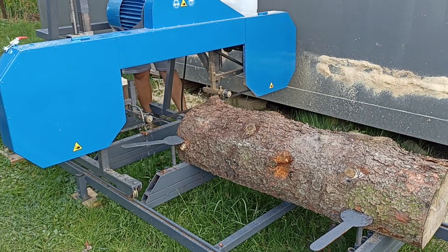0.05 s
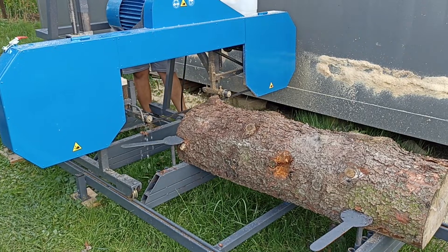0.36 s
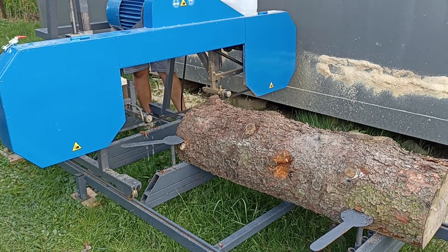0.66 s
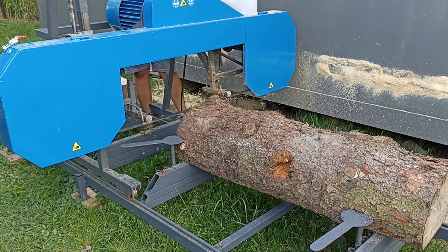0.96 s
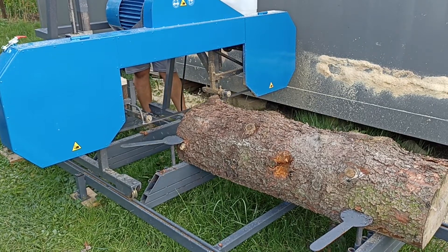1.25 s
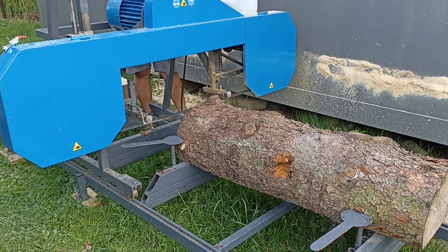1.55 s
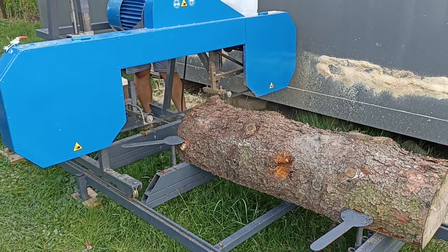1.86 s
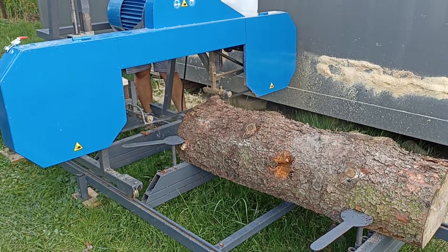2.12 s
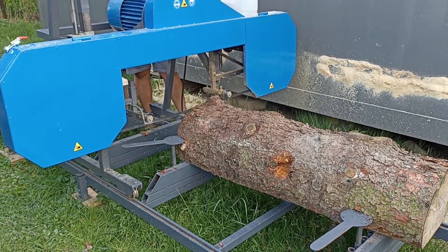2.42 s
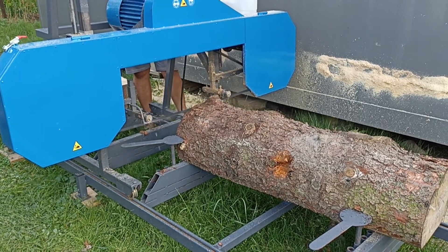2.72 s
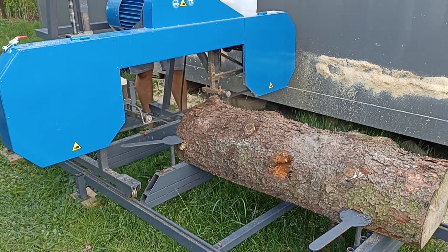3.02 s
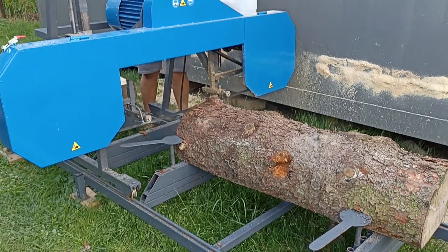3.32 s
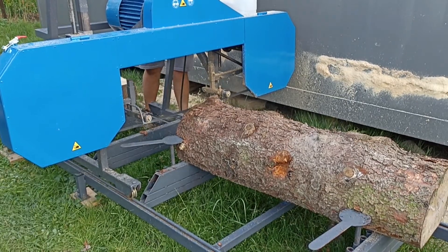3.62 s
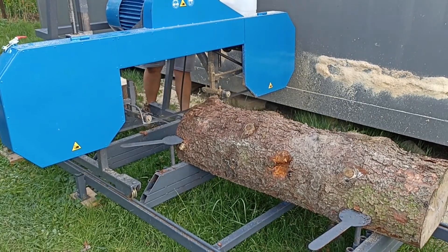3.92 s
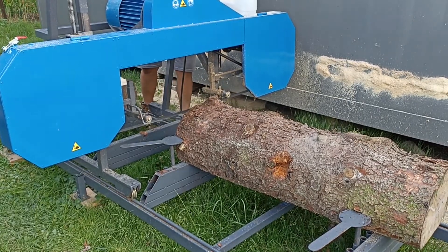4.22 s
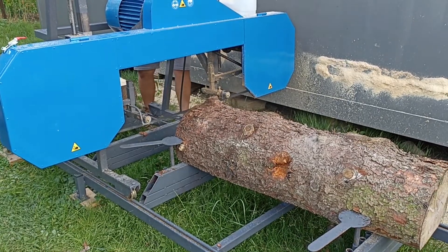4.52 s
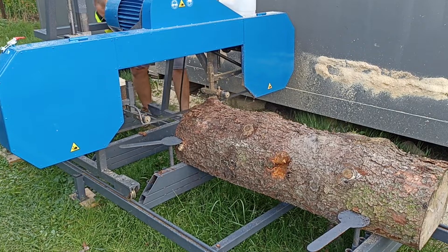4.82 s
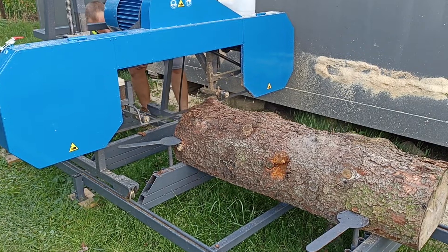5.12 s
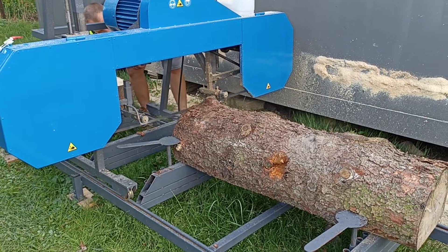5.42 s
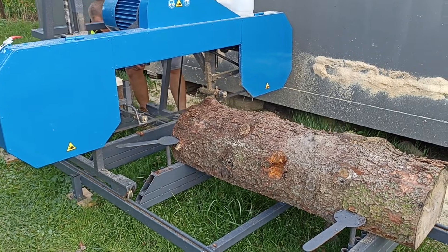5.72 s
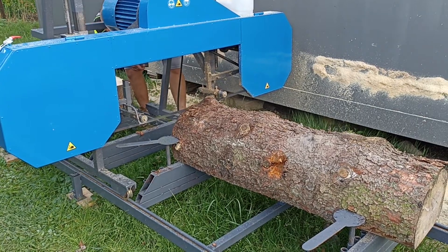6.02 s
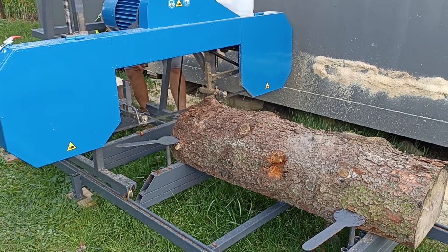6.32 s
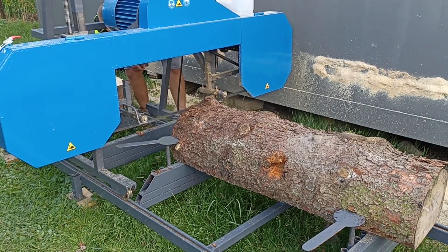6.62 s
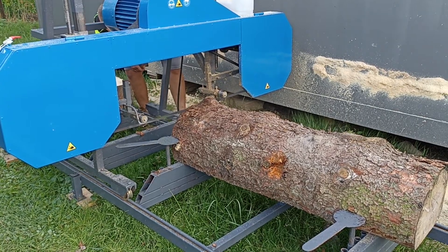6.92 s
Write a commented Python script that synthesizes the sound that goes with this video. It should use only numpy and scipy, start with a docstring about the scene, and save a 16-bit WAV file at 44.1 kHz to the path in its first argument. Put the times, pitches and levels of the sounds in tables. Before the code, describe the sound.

For the first half second there is only quiet open air with a few faint clicks and dull bumps from a machine's controls. At about 0.6 seconds a switch snaps and the motor of an electric band sawmill starts with a jolt. A brief metallic groan and a thin squeak follow around 0.8 seconds. The wheels run up with a rising whine, a hollow boom from the steel covers and a short rattling shudder, reaching full speed just before 2 seconds. From there the saw runs steadily: a drone of many tones, a low rumble, a fast even rattle and a bright blade hiss, stronger on the right. From roughly 3.5 to 6.5 seconds the blade slaps lightly and rapidly against its guides. The sound eases very slightly after 4 seconds and is still running at the end, around 7 seconds.

```python
"""A few small clicks and bumps sound in quiet open air; then the switch of a band sawmill snaps in.
The motor jolts, the frame groans briefly, a squeak follows, and the band wheels run up in just over a
second while the passing teeth sweep through the steel's resonances. At full speed wheels and belt drone
at multiples (orders) of the rotation rate and rattle on every turn, the wheel covers boom, and the
blade slaps its guides and hisses through them by friction."""
import sys
import numpy as np
from scipy.fft import rfft, irfft, next_fast_len
from scipy.io import wavfile
from scipy.ndimage import uniform_filter1d, map_coordinates

SR = 44100
rng = np.random.default_rng(int(sys.argv[2]) if len(sys.argv) > 2 else 0)


def int16_out(signal):
    """Quantize to a 16-bit WAV file."""
    q = np.round(np.clip(np.atleast_2d(signal).T, -1, 1) * 32767)
    wavfile.write(sys.argv[1], SR, q.astype(np.int16))


N = 315756

# likeness of the two channels: (frequency [Hz], correlation [0..1])
COHERENCE = [(30, 0.068), (100, 1), (400, 0.84), (800, 0.84), (1400, 0.55), (3000, 0.064), (15000, 0.057)]
# stereo balance: (frequency [Hz], left minus right [dB])
BALANCE_CURVE = [(100, 0), (400, -1), (800, -0.5), (1500, -4.5), (3300, -6), (4600, -10), (6000, -9.5),
                 (6800, -16.5), (8400, -8.5), (9500, -2), (10800, 2.5), (12000, 8.5), (14000, 10.5),
                 (15700, 5.5)]
# noise spectra of air, clicks, thuds, rumble, rattle and hiss: (frequency [Hz], relative level [dB])
AIR_SPECTRUM = [(20, -10), (50, -9), (100, -5), (300, -9), (600, -12), (1000, -16.5), (3000, -21.5),
                (5000, -23), (8000, -24.5), (15000, -27)]
CLICK_SPECTRUM = [(200, -14), (1200, -3), (2500, 0.5), (4500, -0.5), (6600, 6), (9000, -6), (12000, -4),
                  (15500, -16)]
THUD_SPECTRUM = [(30, -40), (60, -19.5), (95, -7), (170, 0), (400, -4), (800, -8), (2000, -24.5)]
RUMBLE_SPECTRUM = [(20, -30), (48, -22), (66, -15), (92, -5), (160, 0.5), (330, 0.5), (700, 0.5),
                   (1700, -3), (2600, -1), (4500, -14.5), (9000, -29)]
RATTLE_SPECTRUM = [(50, -16), (100, -28), (170, 4.5), (700, -1.5), (1800, 13.5), (2800, -7), (3400, -7.5),
                   (3900, -23), (5500, -26)]
HISS_SPECTRUM = [(300, -40), (1200, -12), (2800, -2), (4300, -3.5), (5000, -0.5), (5600, -0.5), (7500, 2.5),
                 (8600, -3), (9700, -5.5), (10800, -3), (12200, 3), (14000, -0.5), (15700, -5.5)]
# resonances of controls, steel wheel covers and blade: (frequency [Hz], width [Hz], gain [dB])
CONTROL_MODES = [(2400, 250, 10), (3600, 500, 3), (6600, 650, 4)]
COVER_MODES = [(287.6, 5.7, 8), (429, 78, 3), (610, 110, 1.5), (934, 70, 6), (1665, 32, 6.5), (2220, 96, 9)]
BLADE_MODES = [(2900, 130, -6.5), (3363, 290, 6.5), (4236, 250, 4), (4880, 160, -5), (5543, 140, 4),
               (6490, 95, 7), (6700, 132, 9), (6920, 380, 12.5), (7400, 140, 4.5), (6900, 120, -19),
               (8670, 94, 5.5), (11738, 41, 13)]
# resonances of the blade guide and the frame: (frequency [Hz], half-width [Hz], gain [dB])
GUIDE_MODES = [(1580, 53, 15), (2080, 100, 11), (1040, 79, -2), (3340, 125, 1.5)]
FRAME_MODES = [(612.8, 13, 9), (926, 36, 1), (1600, 75, -4), (1937, 49, -1), (2150, 12, 10),
               (3290, 32, 8.5), (4027, 19, 8)]
# small clicks at the controls, then the switch: (time [s], relative level [dB])
CONTROL_CLICKS = [(0.043, -46.5), (.0712, -52), (.1201, -51), (.2339, -53), (.2867, -51), (.3242, -50),
                  (.334, -52), (0.383, -48), (.4184, -54), (.4758, -50), (.558, -45), (0.572, -30),
                  (0.58, -29)]
# dull bumps, then the motor's jolt: (time [s], level [dB], t60 [s], thud relative to sway [dB])
FRAME_BUMPS = [(.282, -47, .08, -14), (.329, -48, .11, -14), (.378, -54, .12, -8), (.419, -52, .1, -12),
               (.443, -53, .07, -12), (.592, -43, .45, 6), (.617, -37.5, .32, 1.5)]
# a brief groan of the frame ringing as the saw starts, then a squeak:
# (time [s], hold [s], frequency [Hz], level [dB], left minus right [dB])
START_TONES = [(.77, .08, 612, -33, -1), (.81, .06, 4110, -38, -6)]
# the band wheels run up, then hold their speed: (time [s], speed [turns/s])
WHEEL_SPEED = [(.56, 0), (1.8, 16.3), (1.86, 17), (1.95, 17.345)]
# wheel tones that waver around a steady level: (order [cycles/turn], relative level [dB])
DRONE_ORDERS = [(9, -21), (12, -25), (14, -23), (19, -20), (22, -20), (23, -26), (26, -24), (32, -18),
                (34, -23), (48, -20), (49, -19), (56, -23), (60, -21), (74, -21), (75, -21), (83, -20),
                (89, -21), (90, -17), (93, -22), (96, -22), (97, -19), (109, -22), (124, -16), (127, -16),
                (128, -22), (129, -21), (133, -19), (159, -22), (201, -23), (206, -18)]
# wheel tones that slowly grow or fade: (order before rounding [cycles/turn], level [dB], drift [dB/s])
HUM_ORDERS = [(17, -40.5, -1.5), (20, -50, 2.16), (24, -34, .1), (25, -32.5, -1.5), (35, -48.5, 1.5),
              (58, -49.5, 1.5), (63.25, -40, -5)]
# where in the turn each mode of the guide is struck: (position [turns])
SLAP_POSITIONS = [0.38, 0.71, .35, 0.55]

TIME = np.arange(N) / SR


def amp(db):
    """Decibels to amplitude ratio."""
    return 10 ** (np.asarray(db) / 20)


def unit(x):
    """Normalisation to rms 1."""
    return x / np.sqrt(np.mean(x ** 2) + 1e-20)


def along(points, hz):
    """Interpolation of (frequency, value) points on a logarithmic axis."""
    freqs, values = np.transpose(points)
    return np.interp(np.log(hz + 1), np.log(freqs + 1), values)


def white():
    """Two uncorrelated white noises."""
    return rng.standard_normal((2, N))


def wobble(rate):
    """Smooth random modulation: a spline through `rate` knots a second."""
    grid = np.linspace(0, N, 4000)
    knots = rng.standard_normal(int(N * rate / SR) + 4)
    return np.interp(np.arange(N), grid, map_coordinates(knots, [grid * rate / SR]))


def arch(peak_s, rise_db_per_s, hold_s, fall_db_per_s):
    """Exponential growth, a hold at 0 dB and exponential decay, as an envelope in dB."""
    t = TIME - peak_s
    return rise_db_per_s * np.minimum(t, 0) - fall_db_per_s * np.maximum(t - hold_s, 0)


def filtered(x, response):
    """Linear filtering: the spectrum of x times a frequency response."""
    size = next_fast_len(N + SR // 4)
    return irfft(rfft(x, size) * response(np.fft.rfftfreq(size, 1 / SR)), size)[..., :N]


def lift(modes, hz):
    """Resonant emphasis: the dB that a body's modes add at each frequency."""
    return sum(db / (1 + (2 * (hz - centre) / width) ** 2) for centre, width, db in modes)


def resonate(x, modes):
    """Forced vibration: a body responds to x mainly near its modes."""
    return filtered(x, lambda hz: sum(amp(db) / (1 + ((hz - centre) / half_width) ** 2)
                                      for centre, half_width, db in modes))


def placed(pair, spectrum, modes=()):
    """Partial coherence: two unrelated signals, coloured and mixed with bass alike and treble apart."""
    def colour(hz):
        angle = np.arccos(along(COHERENCE, hz)) / 2
        return amp(along(spectrum, hz) + lift(modes, hz)) * [np.cos(angle), np.sin(angle)]

    def balance(hz):
        ratio = amp(along(BALANCE_CURVE, hz))
        return np.array([ratio, np.ones_like(ratio)]) / np.hypot(ratio, 1)
    mid, side = filtered(pair, colour)
    return unit(filtered(np.array([mid + side, mid - side]), balance))


def open_air():
    """Ambient noise: a steady floor, strongest in the bass."""
    return amp(-60.5) * placed(white(), AIR_SPECTRUM)


def knocks(click_db, sway_hz):
    """Impact and damped vibration: the controls click, and dull bumps rock the frame."""
    def burst(start, t60, attack_s):
        age = TIME - start
        return np.clip(age / attack_s, 0, 1) * amp(-60 * np.maximum(age, 0) / t60)
    clicks = sum(amp(db) * burst(start, t60=0.055, attack_s=0.0008) for start, db in CONTROL_CLICKS)
    thud = placed(white(), THUD_SPECTRUM)
    out = amp(click_db) * clicks * placed(white(), CLICK_SPECTRUM, CONTROL_MODES)
    for start, db, t60, thud_db in FRAME_BUMPS:
        sway = np.sin(2 * np.pi * sway_hz * (TIME - start))
        out += amp(db) * burst(start, t60, attack_s=0.008) * (amp(thud_db) * thud + sway)
    return out


def groan_and_squeak(jitter_rad):
    """Resonance: the frame rings with a brief groan as the saw starts; a thin squeak follows."""
    out = np.zeros((2, N))
    for start, hold, hz, db, pan_db in START_TONES:
        flare_db = arch(peak_s=start, rise_db_per_s=300, hold_s=hold, fall_db_per_s=300)
        phase = 2 * np.pi * hz * TIME + jitter_rad * wobble(90)
        out += amp(db + flare_db + [[pan_db / 2], [-pan_db / 2]]) * np.sin(phase)
    return out


def cover_boom(level_db, mode_hz, half_width_hz):
    """Random excitation: belt noise drives a wheel cover's lowest mode, most of all in the run-up."""
    surge_db = arch(peak_s=1.3, rise_db_per_s=34, hold_s=0.12, fall_db_per_s=5.5)
    ring = unit(resonate(rng.standard_normal(N), [(mode_hz, half_width_hz, 0)]))
    return amp(level_db + surge_db + [[-1], [1]]) * ring


def cover_swell(speed, order):
    """Passage through resonance: the dB the covers add to a rising tone, relative to full speed."""
    grid = np.linspace(0, speed.max(), 400)
    gain_db = np.interp(speed, grid, lift(COVER_MODES, order * grid))
    return gain_db - lift(COVER_MODES, order * speed[-1])


def wheel_hum(speed, turns, waver_db, beat_at):
    """Beating: adjacent orders reinforce once a turn; at full speed each tone slowly grows or fades."""
    at_speed_s = np.maximum(TIME - WHEEL_SPEED[-1][0], 0)
    out = np.zeros(N)
    for order, db, drift in HUM_ORDERS:
        order = round(order)
        level = amp(db + drift * at_speed_s + cover_swell(speed, order) + waver_db * wobble(2.05))
        out += level * np.cos(2 * np.pi * order * (turns - beat_at))
    return np.sqrt(2) * out * amp([[-1], [1]])


def wheel_drone(speed, turns, waver_db, spread):
    """Rotational harmonics: wavering tones of wheels and belt rise in proportion to the speed."""
    out = np.zeros((2, N))
    for order, db in DRONE_ORDERS:
        order = round(order)
        full_hz = order * speed[-1]
        level = amp(db + cover_swell(speed, order) + waver_db * wobble(1.102))
        phase = 2 * np.pi * (order * turns + rng.random())
        right_shift = spread * rng.choice([-1, 1]) * np.arccos(along(COHERENCE, full_hz))
        lean = amp(along(BALANCE_CURVE, full_hz) / 2)
        out += level * [lean * np.sin(phase), np.sin(phase + right_shift) / lean]
    return out


def wheel_rattle(turns, uneven_db, orders=300, size=8192):
    """Periodic excitation: the bumps of belt and rims recur each turn, in a slowly drifting pattern."""
    out = np.zeros((2, N))
    tonal_orders = [round(order) for order, *_ in DRONE_ORDERS + HUM_ORDERS]
    blend = np.pi / 4 + 0.45 * wobble(0.71)
    for share in (np.cos(blend), np.sin(blend)):
        strengths = amp(uneven_db * rng.standard_normal(orders))
        harmonics = strengths * np.exp(2j * np.pi * rng.random((2, orders)))
        harmonics[:, tonal_orders] = 0  # drone and hum supply these
        rims = irfft(harmonics, size)
        out += share * [np.interp(turns % 1 * size, np.arange(size), rim) for rim in rims]
    return placed(out, RATTLE_SPECTRUM)


def band_wheels(speed, turns, pace, gain_db, run_up_db):
    """Superposition: the drone, rattle and rumble of wheels and belt add up and grow with speed."""
    tones = amp(2.5) * pace ** 1.7 * wheel_drone(speed, turns, waver_db=2.0, spread=0.74)
    shudder_db = 13.5 * np.exp(-((pace - 0.81) / 0.16) ** 2)  # the wheels pass a rough speed
    rattle = amp(-14 + shudder_db) * pace * wheel_rattle(turns, uneven_db=7.5)
    rumble = amp(-3.5 + 0.9 * pace) * placed(white(), RUMBLE_SPECTRUM, COVER_MODES)
    onset = np.sqrt(np.minimum(pace / 0.16, 1))
    return amp(gain_db - run_up_db * (1 - pace)) * onset * (tones + rattle + rumble)


def guide_slaps(turns, level_db, sharpness):
    """Repeated impact: for a few seconds the blade slaps its guide each turn, ringing its modes."""
    ring = np.zeros((2, N))
    for mode, position in zip(GUIDE_MODES, SLAP_POSITIONS):
        pulses = np.exp(sharpness * np.cos(2 * np.pi * (turns - position)))
        ring += resonate(pulses * white(), [mode])
    spell_db = arch(peak_s=3.7, rise_db_per_s=4, hold_s=2.6, fall_db_per_s=12)
    return amp(level_db + spell_db + [[-2], [1.5]]) * unit(ring)


def teeth(turns, pace, teeth_per_turn, tone_db, rub_db):
    """Swept excitation: the tooth rate and its octave glide through frame modes that rubbing also rings."""
    phase = 2 * np.pi * teeth_per_turn * turns + 0.6 * wobble(110)
    octave = np.sqrt(pace) * np.sin(2 * phase)
    tone = amp(tone_db + 1.5 * wobble(30)) * pace * (np.sin(phase) + octave)
    scrape_db = arch(peak_s=0.774, rise_db_per_s=150, hold_s=1.0, fall_db_per_s=3.5)
    rub = amp(rub_db + scrape_db) * rng.standard_normal(N)
    return resonate(tone + rub, FRAME_MODES) * amp([[-1], [1]])


def band_ripple(depth_db, spacing_hz):
    """High modal density: the long steel band gives each channel a finely uneven frequency response."""
    grid = np.arange(0, SR / 2, spacing_hz)
    gains = rng.standard_normal((len(grid), 2)).T
    return lambda hz: amp(depth_db * np.array([np.interp(hz, grid, gain) for gain in gains]))


def blade_friction(pace, drag_db, rush_db):
    """Power addition: the hiss's strength joins a steady drag and a rush that grows steeply with speed."""
    drag = amp(drag_db) * pace ** 4 / (pace ** 4 + 0.16 ** 4)  # sets in near 16% of full speed
    rush = amp(rush_db) * pace ** 2.3
    return np.hypot(drag, rush)


def blade_hiss(turns, pace, throb_db, grain_db, flutter_db, dulling):
    """Friction noise: the blade scrapes through its guides in fine grains, pressed harder once a turn."""
    angle = 2 * np.pi * (turns - 0.1)
    press_db = throb_db * (np.cos(angle) + 0.526 * np.cos(2 * angle))
    grains = unit(uniform_filter1d(rng.standard_normal(N), size=30))
    steel = filtered(white() * amp(grain_db * grains), band_ripple(depth_db=2.4, spacing_hz=30))
    scrape = placed(steel, HISS_SPECTRUM, BLADE_MODES)
    treble = filtered(scrape, lambda hz: 1 / (1 + (9500 / (hz + 1)) ** 10))
    scrape -= dulling * (1 - pace) * treble  # slower is duller
    return unit(scrape * amp(press_db + flutter_db * wobble(25)))


def sawmill(switch_on_s, ease_from_s, ease_db_per_s):
    """Synchronous excitation: one rotation sets the pitch of the tones and the rhythm of the rattles."""
    speed = np.interp(TIME, *np.transpose(WHEEL_SPEED))
    turns = np.cumsum(speed) / SR
    pace = speed / speed[-1]  # share of full speed
    wheels = band_wheels(speed, turns, pace, gain_db=-24, run_up_db=12)
    hiss = blade_hiss(turns, pace, throb_db=0.7433, grain_db=1.03, flutter_db=0.68, dulling=0.54)
    blade = blade_friction(pace, drag_db=-23.5, rush_db=-16.5) * hiss
    sweep = teeth(turns, pace, teeth_per_turn=83, tone_db=-23.5, rub_db=-24)
    hum = pace ** 9 * wheel_hum(speed, turns, waver_db=0.5, beat_at=0.48)
    slaps = pace * guide_slaps(turns, level_db=-35, sharpness=3.1)
    boom = cover_boom(level_db=-37, mode_hz=284, half_width_hz=18)
    running = np.clip((TIME - switch_on_s) / 0.014, 0, 1)
    ease = amp(-ease_db_per_s * np.maximum(TIME - ease_from_s, 0))
    return running * (ease * (wheels + blade) + hum + slaps + boom + sweep)


def scene():
    """Superposition: the sounds of the machine add to the quiet open air."""
    saw = sawmill(switch_on_s=0.569, ease_from_s=4, ease_db_per_s=0.5)
    return saw + groan_and_squeak(jitter_rad=0.55) + knocks(click_db=-1.5, sway_hz=88.6) + open_air()


def record(dry):
    """Arrival-time difference: sound reaches the left microphone first; a low-pass cuts the top treble."""
    lead_s, cutoff_hz = np.array([[4e-5], [-4e-5]]), 15780

    def response(hz):
        low_pass = np.sin(np.pi / 2 * np.clip((cutoff_hz - hz) / 300 + 0.5, 0, 1)) ** 2
        return low_pass * np.exp(2j * np.pi * hz * lead_s)
    return filtered(dry, response)


dry = scene()
out = record(dry)
int16_out(out)
```